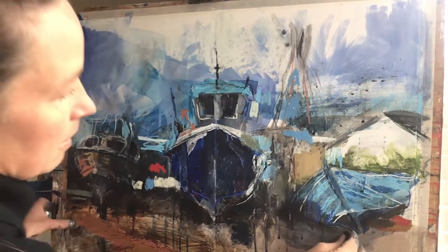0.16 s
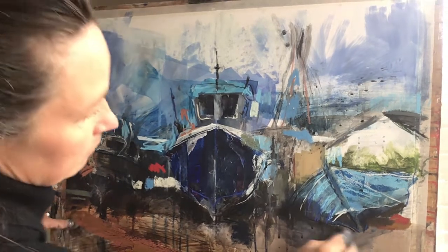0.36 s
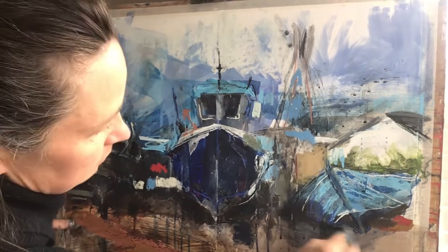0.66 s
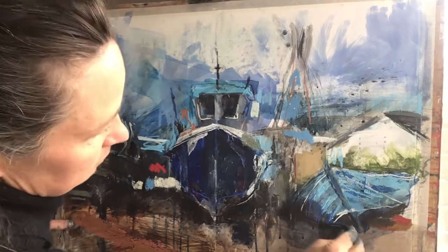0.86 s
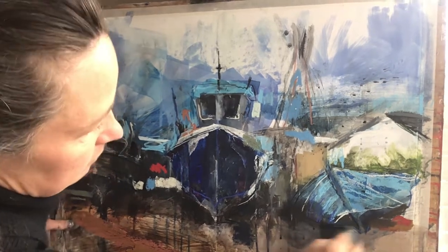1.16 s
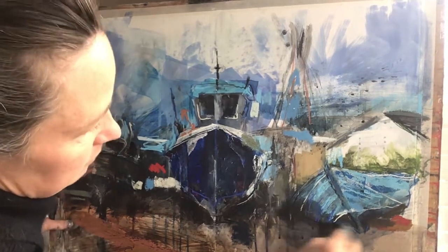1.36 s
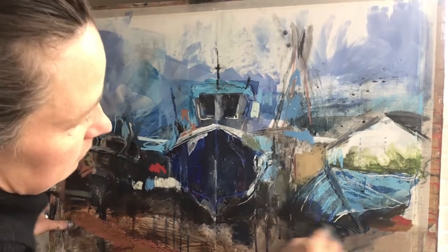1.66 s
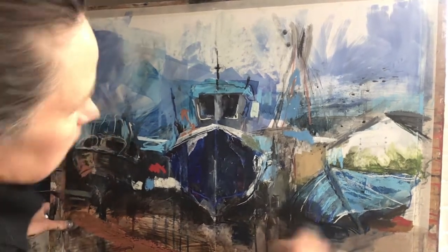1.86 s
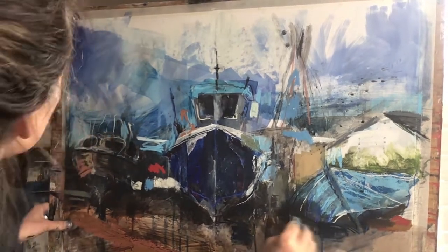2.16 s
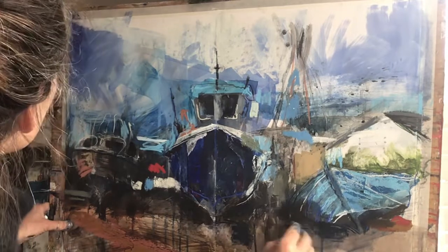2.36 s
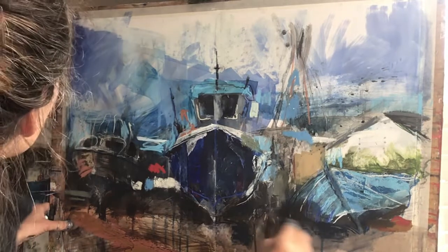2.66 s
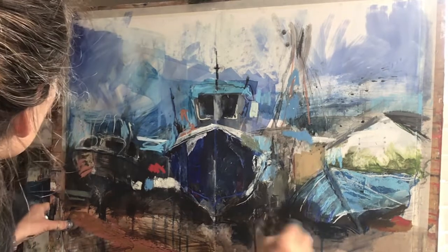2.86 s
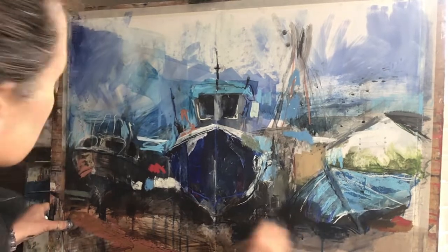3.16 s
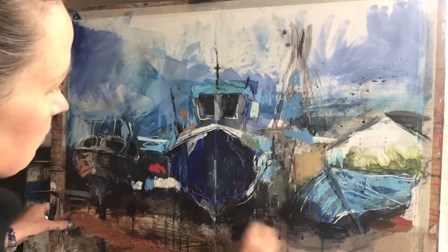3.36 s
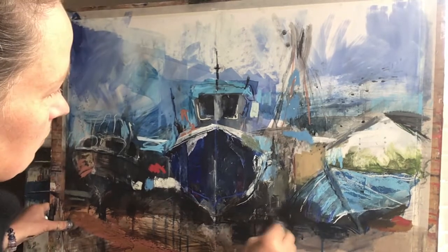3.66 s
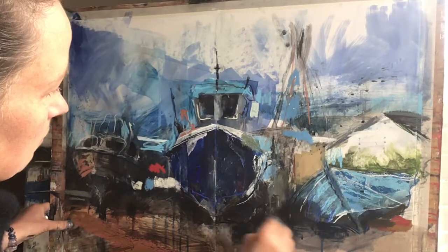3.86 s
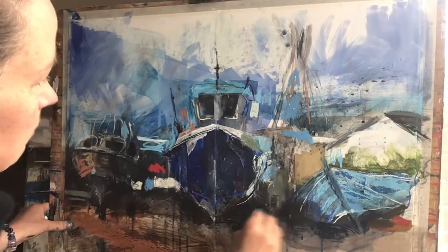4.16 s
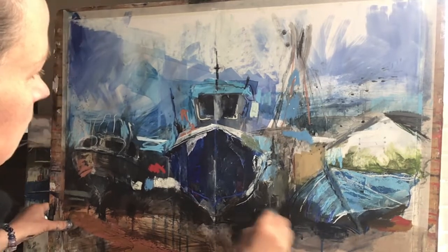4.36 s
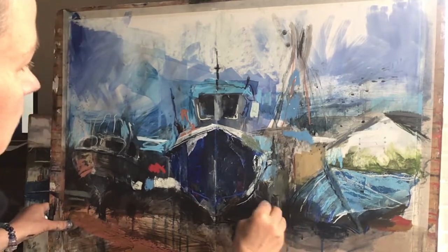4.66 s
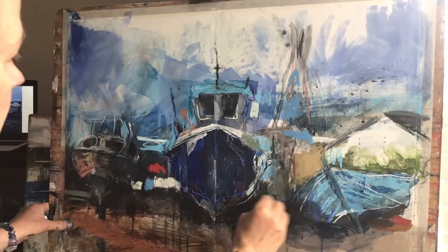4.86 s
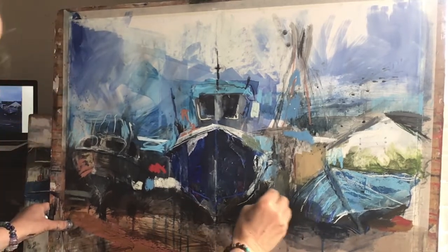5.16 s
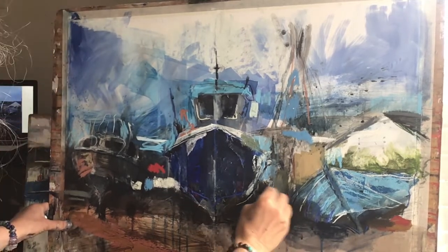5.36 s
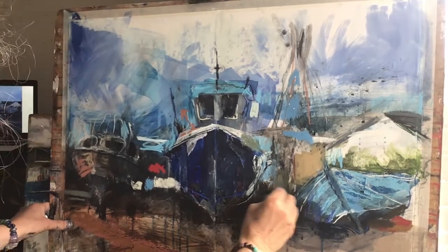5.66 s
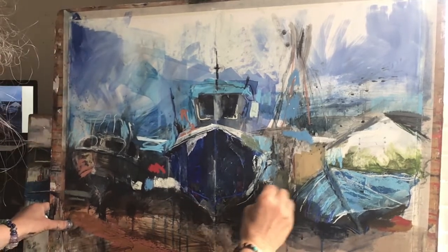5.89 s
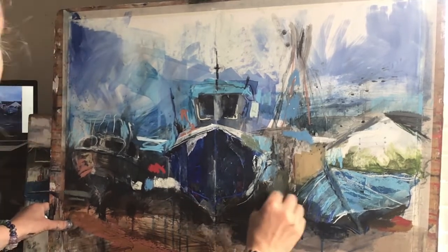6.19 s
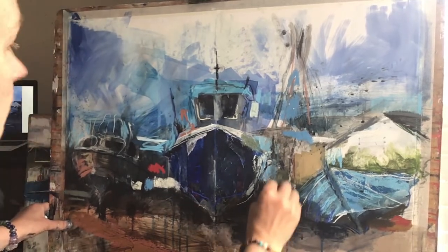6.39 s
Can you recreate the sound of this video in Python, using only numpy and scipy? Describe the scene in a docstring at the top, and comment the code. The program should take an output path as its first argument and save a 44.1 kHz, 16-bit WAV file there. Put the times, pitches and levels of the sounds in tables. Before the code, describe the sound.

Close mono pickup in a small quiet studio: after a few faint touches, a pastel stick rubs rapidly to and fro on a rough painted board, about nine gritty strokes a second. Low wooden knocks are strongest in the first second and a half. The strokes grow quicker and a little louder, pause briefly near the middle, tick down again, then thin to faint scratches over soft room air.

```python
"""A pastel stick scribbles to and fro over a rough painted board on an easel, in a quiet studio.
It opens with a few faint strokes, then hisses steadily: dense grit grains under each stroke's swell.
Ridges of dry paint knock the board (decaying modes and rattle), hardest early on, at the right.
The hand moves to the middle, then up; the stick ticks on landing and the last strokes grow faint.
Board sway, drone (both shaped noise), room answer and air lie below; both channels are the same."""
import sys
import numpy as np
from scipy import signal
from scipy.fft import rfft, irfft, next_fast_len
from scipy.io import wavfile
from scipy.ndimage import uniform_filter1d, map_coordinates

SR = 44100
rng = np.random.default_rng(int(sys.argv[2]) if len(sys.argv) > 2 else 0)


def output_pcm(signal):
    """Save a mono or channel-first signal as 16-bit PCM at the path in sys.argv[1].

    Samples are clipped to [-1, 1] before scaling.
    """
    pcm = np.clip(np.atleast_2d(signal).T, -1, 1) * 32767
    wavfile.write(sys.argv[1], SR, np.round(pcm).astype(np.int16))


N = 287973


# Grit colour. Each row: frequency in Hz, relative density in dB per Hz at the right, middle and upper place.
GRIT_SPECTRUM = [(513, -33, -31, -31.5), (900, -4, -11.5, -13), (1040, -11, -14, -13), (1567, -8, -9, -5),
                 (1955, -3, 0.5, 3.5), (2380, -3.5, -2, -2.5), (2680, -2, 2, -0.5), (3420, 0.5, 1, 1.5),
                 (3960, 0, -3, -3), (4400, -4.5, 1, 1), (5470, -1.5, -0.5, -1.5), (5530, -5, -3, -0.5),
                 (6630, 0, 1.5, -0.5), (8120, -12, -15, -11)]


def scribble(gain, bright_db):
    """Grit breaks off in dense fine grains; brightness shifts weight from about 2 kHz to the treble."""
    grain_level = amp(1.9 * rng.exponential(size=N))
    grains = patchy(rng.standard_normal(N) * grain_level, patchy_db=2.5)
    grit = by_place(grains, GRIT_SPECTRUM)
    treble = filtered(grit, lambda hz: np.clip(np.log2((hz + 1) / 2200) / 1.6, 0, 1))
    dull = filtered(grit, lambda hz: hz < 1600)  # ignores brightness
    middle = grit - treble - dull
    paint_tooth = amp(1.38 * wobble(40) + 1.58 * wobble(150))  # uneven tooth of the paint
    rubbing = dull + middle * amp(-.3 * bright_db) + treble * amp(0.52 * bright_db)
    return gain * paint_tooth * rubbing


# Strokes. Each row: start in seconds, length in seconds, base level in dB, way of the hand.
STROKE_ROWS = [(0.001, 0.027, -54.5, "to"), (0.108, 0.04, -65, "fro"), (0.264, 0.053, -50.5, "fro"),
               (0.325, 0.11, -43, "to"), (0.473, 0.11, -45.5, "fro"), (0.627, 0.079, -42, "to"),
               (0.738, 0.091, -44, "fro"), (0.871, 0.089, -42.5, "to"), (0.988, 0.09, -44.5, "fro"),
               (1.128, 0.092, -44.5, "to"), (1.239, 0.088, -46, "fro"), (1.369, 0.077, -45, "to"),
               (1.473, 0.074, -45, "fro"), (1.58, 0.059, -43.5, "to"), (1.645, 0.034, -45, "to"),
               (1.711, 0.055, -45.5, "fro"), (1.816, 0.074, -39.5, "fro"), (1.912, 0.043, -41.5, "to"),
               (1.982, 0.022, -40, "to"), (2.03, 0.091, -40.5, "fro"), (2.153, 0.093, -44, "to"),
               (2.255, 0.082, -42, "fro"), (2.367, 0.074, -44.5, "to"), (2.479, 0.058, -41, "fro"),
               (2.589, 0.074, -41, "to"), (2.681, 0.062, -41, "fro"), (2.79, 0.07, -41, "to"),
               (2.878, 0.019, -45.5, "fro"), (2.918, 0.045, -43, "fro"), (2.99, 0.019, -39.5, "to"),
               (3.036, 0.03, -39, "to"), (3.079, 0.018, -40, "fro"), (3.118, 0.04, -40.5, "fro"),
               (3.191, 0.019, -45, "to"), (3.327, 0.022, -45, "fro"), (3.379, 0.075, -40.5, "to"),
               (3.481, 0.066, -43.5, "fro"), (3.567, 0.089, -45.5, "to"), (3.673, 0.051, -44.5, "fro"),
               (3.761, 0.075, -46.5, "to"), (3.857, 0.063, -45, "fro"), (3.948, 0.095, -48.5, "to"),
               (4.059, 0.049, -45, "fro"), (4.142, 0.084, -47, "to"), (4.241, 0.055, -44, "fro"),
               (4.325, 0.056, -44.5, "to"), (4.413, 0.05, -42.5, "fro"), (4.496, 0.059, -48.5, "to"),
               (4.583, 0.045, -46.5, "fro"), (4.666, 0.058, -49.5, "to"), (4.749, 0.053, -47, "fro"),
               (4.825, 0.062, -49, "to"), (4.936, 0.035, -50.5, "fro"), (4.997, 0.05, -58.5, "to"),
               (5.097, 0.032, -54.5, "fro"), (5.168, 0.057, -59, "to"), (5.26, 0.034, -52.5, "fro"),
               (5.328, 0.053, -56, "to"), (5.432, 0.037, -53.5, "fro"), (5.504, 0.056, -55.5, "to"),
               (5.608, 0.042, -52.5, "fro"), (5.676, 0.031, -61.5, "to"), (5.81, 0.015, -47, "fro"),
               (5.853, 0.04, -53, "to"), (5.927, 0.19, -67, "to"), (6.165, 0.024, -61.5, "fro"),
               (6.245, 0.17, -69, "to"), (6.45, 0.065, -59.5, "fro")]
# Swell from first to second half of a stroke. Each way: dB at the right, middle and upper place.
SWELL_DB = {"to": (-2.5, -0.6, -0.37), "fro": (3.7, 2.4, 1.5)}
# Brightness of the rubbing before band weighting. Each row: time in seconds, brightness in dB.
BRIGHTNESS = [(0.1, -14), (0.3, 4.5), (1.7, 4), (1.85, -4.5), (2.1, 3.5), (3.2, -2), (3.5, 4), (4.15, 4),
              (4.45, -2), (5.55, -2.5), (5.8, -12.5), (6.3, -8), (6.5, -4)]
# Way back over way out, before band weighting: brightness in dB at the right, middle and upper place.
FRO_BRIGHTER_DB = (1.4, 0.8, 4)


def pressure():
    """Gain and brightness of the rubbing: each stroke rises, swells, and stops at the turn."""
    power, bright = np.full(N, 1e-12), np.zeros(N)
    margin = SR // 10
    for start_s, length_s, level_db, way in STROKE_ROWS:
        place = place_at(start_s)
        way_share = .5 if way == "fro" else -.5
        bright_db = np.interp(start_s, *np.transpose(BRIGHTNESS)) + FRO_BRIGHTER_DB[place] * way_share
        first = max(round(start_s * SR) - margin, 0)
        last = min(round((start_s + length_s) * SR) + margin, N)
        t = np.arange(first, last) / SR
        u = np.clip(2 * (t - start_s) / length_s - 1, -1, 1)  # -1 at the start, 1 at the turn
        before_s, after_s = np.maximum(start_s - t, 0), np.maximum(t - start_s - length_s, 0)
        shape_db = SWELL_DB[way][place] * u - 3.58 * u ** 2
        edge_db = -1010 * before_s - 950 * after_s
        stroke_power = amp(level_db + shape_db + edge_db) ** 2
        power[first:last] += stroke_power
        bright[first:last] += stroke_power * bright_db
    return np.sqrt(power), bright / power


# Knocks. Each row: time in seconds, ring of the board in dB, rattle in dB; both are base levels.
KNOCK_ROWS = [(0.012, -44.5, -45.5), (0.365, -42, -45), (0.536, -37, -49), (0.648, -38.5, -51.5),
              (0.789, -37.5, -46.5), (0.9, -34, -45), (1.035, -34, -49.5), (1.157, -33, -41.5),
              (1.292, -40.5, -46), (1.391, -37.5, -42.5), (1.507, -38, -51.5), (1.598, -35, -42.5),
              (1.868, -47.5, -48.5), (2.056, -48.5, -54.5), (2.108, -42.5, -44.5), (2.271, -43, -52),
              (2.339, -50, -39.5), (2.568, -44, -48.5), (2.585, -45, -48), (2.723, -46, -43.5),
              (2.918, -49, -54), (3.022, -56.5, -52), (3.476, -50, -56), (3.63, -42.5, -53),
              (3.677, -43.5, -45.5), (3.785, -45, -48), (3.981, -41, -50.5), (4.188, -46, -45.5),
              (4.235, -53, -52.5), (4.52, -53, -51), (4.579, -48.5, -53.5), (4.756, -49.5, -52),
              (4.928, -50.5, -53), (5.012, -58, -53.5), (5.787, -59.5, -54)]
# Ringing modes of the board. Each row: nominal frequency in Hz, t60 in seconds.
BOARD_MODES = [(88, .14), (170, .11), (227, .15)]
# Mode offsets. Each way: a row per place (right, middle, upper) of low, second and third mode in dB.
RING_OFFSETS_DB = {"to": [(-1.7, 0.2, -0.9), (4, 0.2, -5), (-1, 0.2, -4)], "fro": [(1.1, 0.2, -14),
                   (-0.2, 0.18, -7.5), (-3.5, 0.18, -2)]}
RATTLE_HZ = 294  # above the three ringing modes


def knocks():
    """Ridges of paint hit the board: modes swell for milliseconds; a dry rattle starts faster."""
    out, t = np.zeros(N + SR), np.arange(SR // 3) / SR
    board_noise = by_place(rng.standard_normal(N + SR), DRONE_SPECTRUM)
    rattle = coloured(board_noise, [(RATTLE_HZ / 2, -30), (RATTLE_HZ, 0)])
    shapes = [(1 - np.exp(-t / .005)) * amp(-60 * t / t60_s) for _, t60_s in BOARD_MODES]
    push = 4 * amp(-60 * t / 0.027) * np.sin(2 * np.pi * 300 * t)  # the blow itself
    for time_s, ring_db, rattle_db in KNOCK_ROWS:
        modes_db = ring_db + np.array(RING_OFFSETS_DB[way_at(time_s)][place_at(time_s)])
        at = round(time_s * SR)
        detunes = rng.normal(0, 0.027, len(BOARD_MODES))
        ring = np.zeros(len(t))
        for (hz, _), shape, mode_db, detune in zip(BOARD_MODES, shapes, modes_db, detunes):
            tone = np.sin(2 * np.pi * hz * (1 + detune) * t)
            ring += amp(mode_db) * shape / shape.max() * tone
        decaying_rattle = 1.52 * amp(-60 * t / 0.12) * rattle[at:at + len(t)]
        dry_knock = amp(rattle_db) * (push + decaying_rattle)
        out[at:at + len(t)] += ring + (1 - np.exp(-t / 0.0022)) * dry_knock
    return out[:N]


# Landings of the stick. Each row: time in seconds, noise level at the onset before colouring in dB.
TAP_ROWS = [(0.619, -39.5), (3.312, -36.5), (5.791, -46.5), (6.454, -51.5)]


def taps():
    """The stick lands: a broad noise tick with a t60 of 40 ms."""
    out, t = np.zeros(N + SR), np.arange(SR // 20) / SR
    for time_s, level_db in TAP_ROWS:
        tick = amp(level_db - 60 * t / 0.04) * rng.standard_normal(len(t))
        out[round(time_s * SR):][:len(t)] += tick
    ticks = out[:N]
    return coloured(ticks, [(150, -19.0), (500, -6.0), (3000, 9), (7500, -7)]) * ticks.std()


# Board movement. Each row: time in seconds, sway in dB, drone in dB before its wobble and beat.
SHAKE_LEVELS = [(0, -33.5, -61.5), (.9, -38.5, -49), (1.8, -39, -58.5), (2.7, -35.5, -58),
                (3.35, -40.5, -64), (3.9, -39, -53), (4.8, -38.5, -52.5), (5.5, -43.5, -66),
                (6.53, -49, -66.5)]
# Sway colour. Each row: frequency in Hz, relative density in dB per Hz.
SWAY_SPECTRUM = [(2, -15.5), (5, 1.5), (19, -2.5), (30, -12), (50, -30), (80, -29), (150, -65)]
# Board colour, also in the rattle. Each row: frequency in Hz, relative density in dB per Hz at the
# right, middle and upper place.
DRONE_SPECTRUM = [(60, -0.5, -1, 1.5), (203, 0, 1, -2), (310, -8, -7, -11.5), (338, -10, -9, -14.5),
                  (482, -8, -9, -5), (670, -15, -12.5, -18.5), (854, -25.5, -13.5, -12.5),
                  (1010, -21.5, -17, -21), (2080, -35.5, -39.5, -41)]


def easel(gain):
    """The board drones with each stroke and sways at far lower frequencies."""
    knot_s, sway_db, drone_db = np.transpose(SHAKE_LEVELS)
    t = np.arange(N) / SR
    sway = amp(np.interp(t, knot_s, sway_db)) * coloured(rng.standard_normal(N), SWAY_SPECTRUM)
    beat = (gain / uniform_filter1d(gain, SR // 4)) ** 0.68  # single stroke against the run of strokes
    drone_gain = amp(np.interp(t, knot_s, drone_db) + 1.95 * wobble(40))
    drone = drone_gain * by_place(rng.standard_normal(N), DRONE_SPECTRUM)
    return sway + beat * drone


# Room decay. Each row: frequency in Hz, t60 in seconds.
STUDIO_T60 = [(200, 0.6), (8000, 0.21)]


def studio(x):
    """Each frequency of the room's answer dies at its own speed, after a 300-sample delay."""
    hz, t, z = signal.stft(rng.standard_normal(SR // 2), SR, nperseg=256)
    decay = amp(-60 * t / along(STUDIO_T60, hz)[:, None])
    tail = signal.istft(z * decay, SR, nperseg=256)[1]
    return signal.fftconvolve(np.pad(x, (300, 0)), tail / np.linalg.norm(tail))[:N]


# Room air colour. Each row: frequency in Hz, relative density in dB per Hz.
AIR_SPECTRUM = [(40, -26), (200, -25), (480, -24), (700, -33), (1500, -35), (7600, -46)]


def room_tone():
    """The quiet studio's air: steady coloured noise."""
    return amp(-66.5) * coloured(rng.standard_normal(N), AIR_SPECTRUM)


# The hand moves to the middle, then the upper place: times in seconds.
MOVE_TIMES = [1.79, 3.3]


def place_at(s):
    """Place of the hand at time s: 0 right, 1 middle, 2 upper."""
    return np.searchsorted(MOVE_TIMES, s)


def by_place(x, table):
    """x in the colour of the place where the stick works at each moment."""
    hz, *places = np.transpose(table)
    place = place_at(np.arange(len(x)) / SR)
    return np.choose(place, [coloured(x, np.c_[hz, db]) for db in places])


def way_at(s):
    """The way of the stroke whose middle is nearest to time s."""
    return min(STROKE_ROWS, key=lambda row: abs(row[0] + row[1] / 2 - s))[-1]


def patchy(x, patchy_db):
    """Bands of random gain flare briefly; their mean over neighbouring bands is removed."""
    z = signal.stft(x, nperseg=512)[2]
    field = uniform_filter1d(rng.standard_normal(z.shape), 4, 0)
    field = uniform_filter1d(field, 8, 1)
    field -= uniform_filter1d(field, 40, 0)
    return signal.istft(z * amp(patchy_db * unit(field)), nperseg=512)[1][:N]


def wobble(rate_hz):
    """A smooth random curve, rate_hz knots a second."""
    knots = rng.standard_normal(int(N * rate_hz / SR) + 4)
    return map_coordinates(knots, [np.arange(N) * rate_hz / SR])


def coloured(x, spectrum):
    """x shaped by (Hz, dB) points, rms 1."""
    return unit(filtered(x, lambda hz: amp(along(spectrum, hz))))


def filtered(x, response):
    """x times a response of frequency."""
    m = next_fast_len(len(x) + 8192)
    return irfft(rfft(x, m) * response(np.fft.rfftfreq(m, 1 / SR)), m)[:len(x)]


def along(points, hz):
    """(Hz, value) points interpolated on a log frequency axis."""
    f, v = np.transpose(points)
    return np.interp(np.log(hz + 1), np.log(f + 1), v)


def unit(x):
    """x at rms 1."""
    return x / np.sqrt(np.mean(x ** 2) + 1e-20)


def amp(db):
    """Amplitude factor of a level in dB."""
    return 10 ** (np.asarray(db) / 20)


def scene():
    """Stick and knocks with their room answer, over the moving board and the air."""
    gain, bright_db = pressure()
    near = scribble(gain, bright_db) + taps() + knocks()
    air = room_tone()
    mono = near + amp(-12.5) * studio(near) + easel(gain) + air
    return np.tile(mono, (2, 1))


TOP_HZ = 7630


def record(dry):
    """One close microphone for both channels; above the band limit only a trace remains."""
    def band_limit(hz):
        return np.clip((TOP_HZ - hz) / 180, 0, 1) ** 2 + 3e-3
    return np.array([filtered(channel, band_limit) for channel in dry])


dry = scene()
out = record(dry)
output_pcm(out)
```